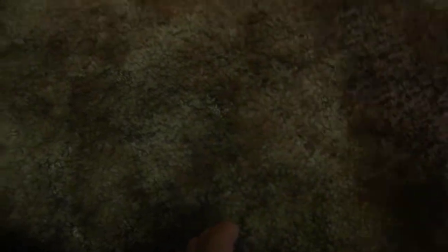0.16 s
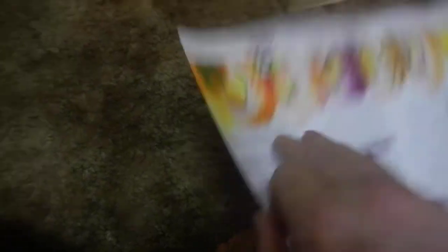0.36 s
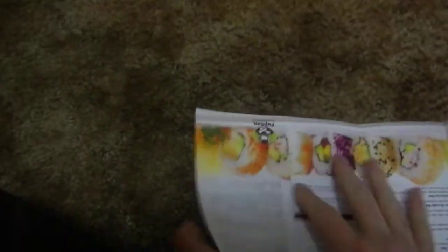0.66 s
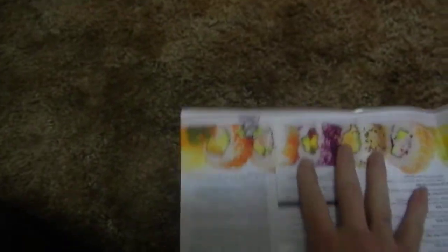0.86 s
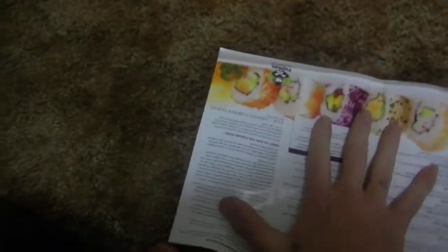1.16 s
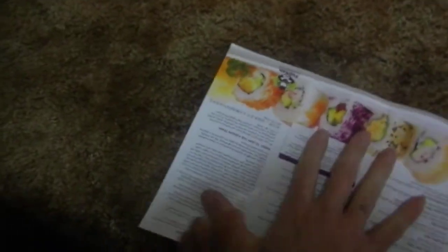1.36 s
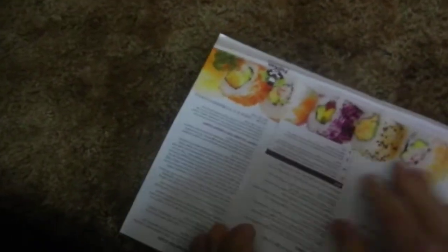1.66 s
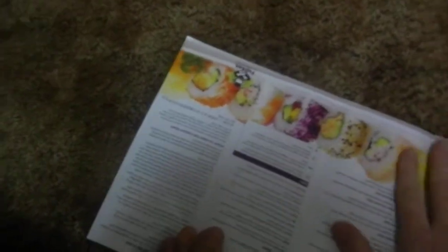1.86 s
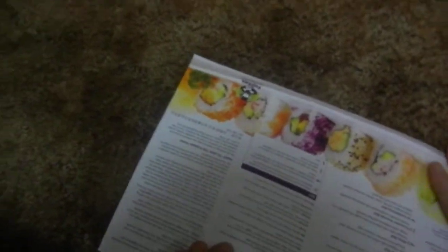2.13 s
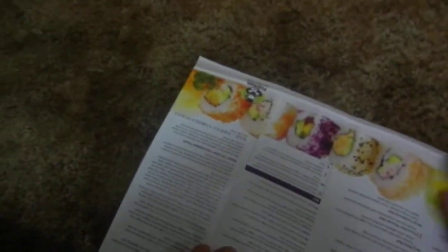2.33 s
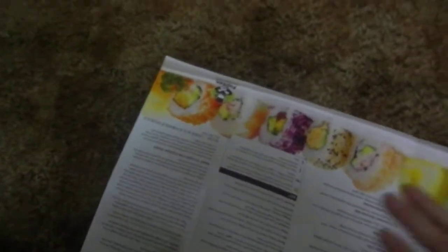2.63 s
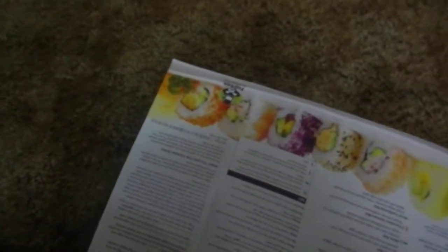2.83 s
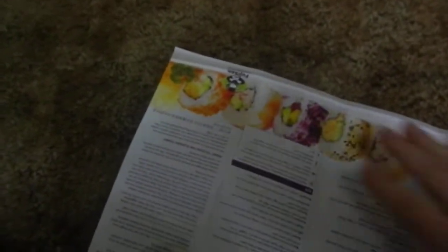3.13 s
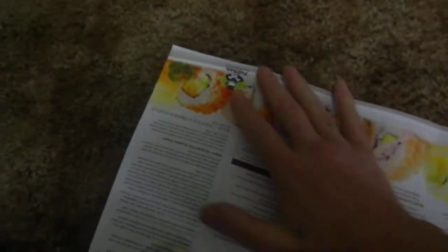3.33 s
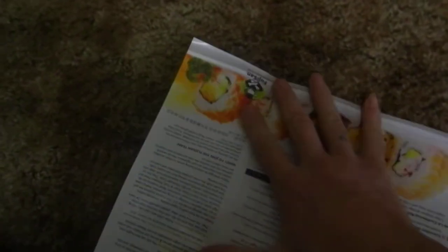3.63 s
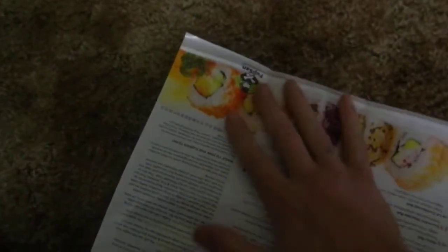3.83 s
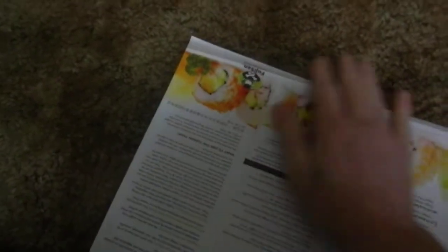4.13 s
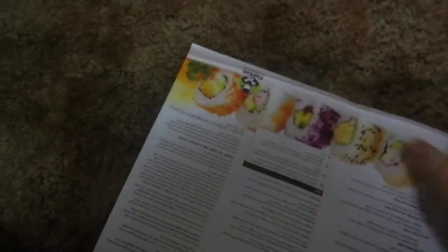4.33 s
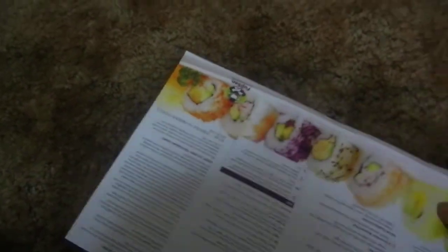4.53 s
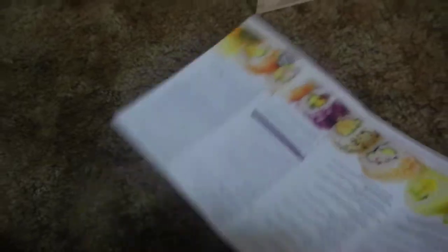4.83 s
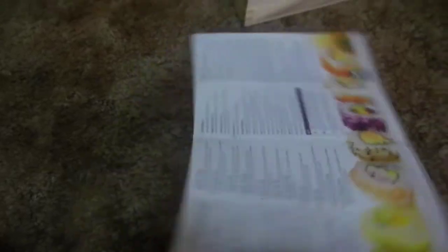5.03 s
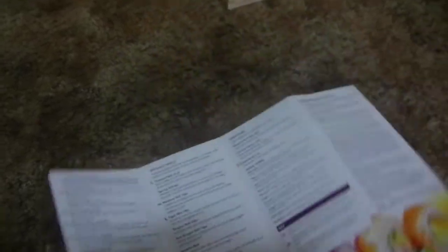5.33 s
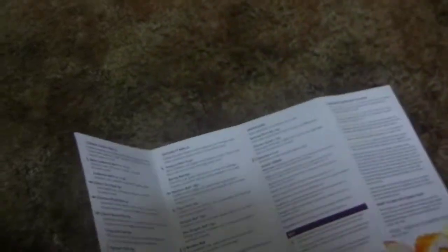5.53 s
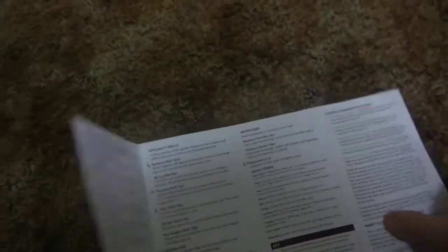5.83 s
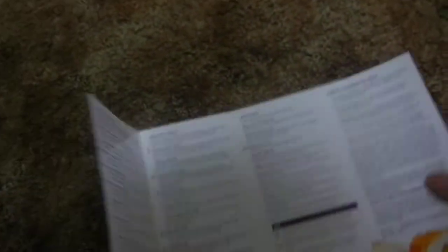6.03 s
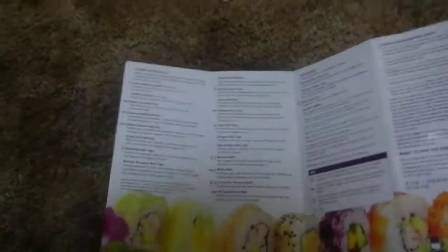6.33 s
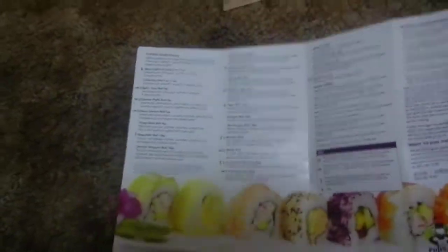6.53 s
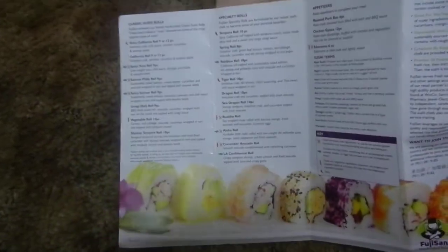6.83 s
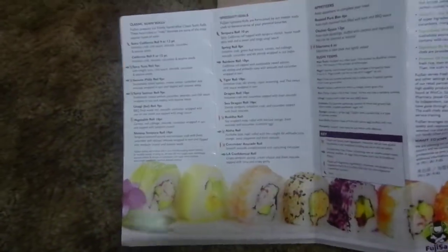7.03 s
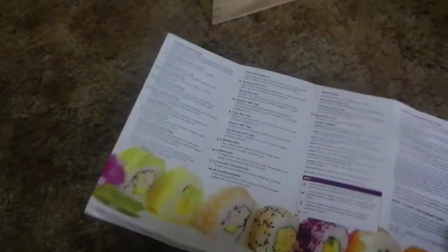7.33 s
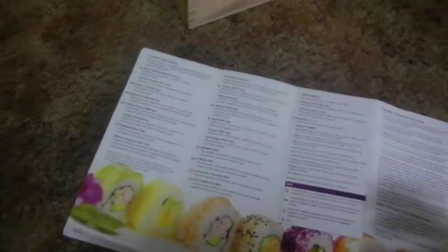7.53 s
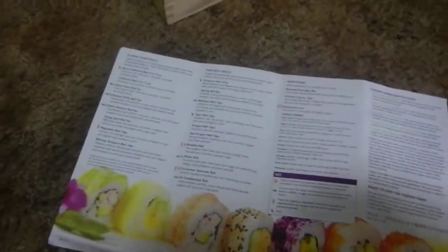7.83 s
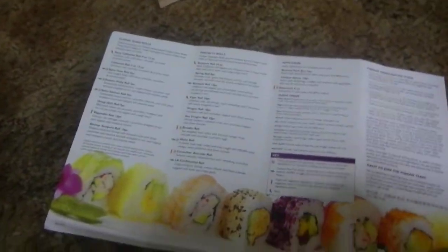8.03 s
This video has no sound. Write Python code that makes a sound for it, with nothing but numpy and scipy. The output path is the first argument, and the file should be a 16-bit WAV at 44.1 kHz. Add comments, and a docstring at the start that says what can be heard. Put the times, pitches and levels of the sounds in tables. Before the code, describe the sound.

Glossy, fairly stiff paper is handled very close to the microphone in a small, dry, carpeted room with faint air and a low steady hum. At once a rapid burst of snaps comes with soft low thuds; after a brief lull, more crumpling pops fall at 0.5 and 0.7 s. A bright sliding hiss swells from about 0.8 to 1.4 s. Further smoothing strokes follow from 1.7 s, busiest between 2 and 3 s, with crisp separate snaps and a sharp scrape near 3. Pops continue at 3.4 to 3.8 s, with a muted thud at 3.6. Gentler rubbing leads to a strong cluster of unfolding snaps around 4.8 s. Lighter rustles follow, then a hard crack near 5.95 and smaller pops at 6.2 and 6.6. Afterwards movement thins to faint rustles and tiny dry falling ticks, nearly still by 8 s.

```python
"""A quick burst of paper snaps comes first: a glossy folded leaflet is laid on a carpet, close by.
It is slid about and smoothed by hand, then lifted and opened. Strokes and bends are shaped random slips:
hiss as it slides, soft crumpling as it bends. Filtered pulses snap where a panel or crease buckles.
Soft low thuds come in the opening burst, near half a second and once more near the middle.
Late on come faint falling chirps, heard as dry ticks.
Shaped noise and two wavering sines make the air and low hum of a small, dead room."""
import sys
import numpy as np
from scipy import signal
from scipy.fft import rfft, irfft, next_fast_len
from scipy.io import wavfile
from scipy.ndimage import uniform_filter1d, map_coordinates

SR = 44100
rng = np.random.default_rng(int(sys.argv[2]) if len(sys.argv) > 2 else 0)


def inscribe(sig):
    """Save sig as 16-bit PCM at rate SR to the path in sys.argv[1].

    A 1-D sig is mono; a 2-D sig holds one channel per row.
    Samples are clipped to [-1, 1] before scaling.
    """
    pcm = np.round(np.clip(np.atleast_2d(sig).T, -1, 1) * 32767)
    wavfile.write(sys.argv[1], SR, pcm.astype(np.int16))


N = 360297  # length in samples

# tone colours of bending, of the sliding hiss and of its fine fizz: freq_hz, level_db (relative)
BEND_COLOUR = [(40, -23), (100, -7), (160, -4.5), (270, -8), (380, 5.5), (520, -1), (750, -0.5),
               (1100, -4.5), (1600, -8), (2600, -20), (6000, -52)]
SLIDE_COLOUR = [(300, -35.5), (900, -1.5), (1400, -2.5), (2000, 0), (2800, 1), (4000, -2.5), (5200, -9),
                (7000, -12.5), (11000, -21), (16000, -38)]
FIZZ_COLOUR = [(2000, -22.5), (4500, -1), (6500, -4), (8000, -4), (10000, -5), (12500, -7.5),
               (15800, -11.5)]


def rustle():
    """Sliding gives dense bright slips with a few crinkles; bending gives sparser, lower ones."""
    bend_db, slide_db, fizz_db = handling()
    pressure_db = 0.9 * wobble(45)
    crinkles = 0.3 * slips(rate=160, spread_db=2.5)

    slide_slips = slips(rate=20000, spread_db=1.5) + crinkles
    slide_hiss = stereo(patchy(slide_slips, depth_db=1.3), SLIDE_COLOUR)
    slide = amp(slide_db + pressure_db) * slide_hiss

    fizz_slips = slips(rate=30000, spread_db=0.0) + 0.5 * crinkles
    fine_hiss = stereo(patchy(fizz_slips, depth_db=1.5), FIZZ_COLOUR)
    fizz = amp(fizz_db + pressure_db) * fine_hiss

    # a sheet that is bent harder gives way in lumps; at rest it barely stirs
    effort = np.interp(bend_db, [-56, -42], [0.15, 1])
    lumps_db = 2 * effort * wobble(60)
    crumple = stereo(patchy(slips(rate=2800, spread_db=2.5), depth_db=1.96), BEND_COLOUR)
    bend = amp(bend_db + lumps_db) * crumple
    return slide + nearby(fizz, echo_db=-28.5) + bend


# strokes of paper over carpet, skin or paper; each gathers speed, runs on and slows to rest:
# full_speed_s, hold_s, hiss_db, fizz_db, rise_s, fall_s
STROKES = [(0.016, .05, -51, -58, 0.11, 0.073), (0.138, .015, -52, -56, 0.02, 0.034),
           (0.27, .03, -55.5, -60.5, .12, .2), (0.456, 0.1, -38.5, -43.5, .03, 0.023),
           (0.665, .06, -39.5, -46, 0.062, .2), (0.843, 0.069, -31, -31, 0.18, 0.52),
           (1.19, 0.2, -37, -35.5, .4, 0.083), (1.48, .06, -54, -56.5, .1, .25),
           (1.728, .09, -45, -45, .1, .1), (1.967, 0.097, -38.5, -38.5, 0.45, 0.39),
           (2.346, 0.013, -34.5, -47, 0.017, 0.025), (2.481, 0.15, -34, -41, 0.014, 0.17),
           (2.588, 0.024, -33, -34.5, 0.046, 0.072), (2.703, 0.066, -38.5, -42, 0.14, 0.061),
           (2.863, .06, -38.5, -46, .03, .06), (2.961, 0.0089, -25.5, -40, 0.024, 0.026),
           (3.24, .08, -62, -78, 0.55, .1), (3.355, 0.051, -39.5, -48, 0.029, .08),
           (3.467, 0.09, -36, -40, 0.078, 0.2), (3.778, .04, -36, -46, .04, 0.092),
           (3.88, 0.051, -37, -36.5, 0.12, 0.21), (4.03, .05, -45.5, -50, 0.11, 0.17),
           (4.316, 0.16, -51.5, -52, 0.083, 0.208), (4.596, 0.15, -38, -46.5, 0.19, 0.24),
           (4.958, 0.17, -52.5, -53.5, .2, .15), (5.227, 0.061, -41, -45.5, 0.057, 0.13),
           (5.386, .02, -47.5, -53, .08, 0.51), (5.567, 0.075, -44, -45.5, .06, 0.22),
           (5.83, 0.019, -37.5, -43, 0.18, .08), (5.92, 0.14, -36.5, -50, 0.12, 0.17),
           (6.165, 0.0099, -30.5, -36.5, .08, 0.039), (6.287, .012, -40, -41, 0.026, 0.017),
           (6.388, 0.17, -44, -46, 0.35, 0.28), (6.71, .06, -57.5, -69.5, .1, 0.31),
           (7.08, 0.12, -45.5, -50.5, 0.112, 0.11), (7.276, 0.14, -53, -55, .1, 0.18),
           (7.55, 0.42, -66.5, -67.5, .2, .2), (8.052, 0.09, -62.5, -62.5, 0.035, .1)]
# the hand bows the sheet: full_bend_s, hold_s, level_db
BOWS = [(0.059, 0.0078, -34), (0.149, 0.043, -47.5), (0.489, 0.042, -31), (0.681, .04, -31.5),
        (0.89, 0.088, -38), (1.706, 0.043, -38), (2.045, 0.051, -35), (3.55, 0.035, -48),
        (3.971, 0.012, -42), (4.5, 0.051, -44), (4.71, 0.086, -42), (5.053, 0.067, -47), (5.223, 0.08, -36),
        (5.58, 0.01, -38.5), (5.827, 0.02, -47), (6.087, 0.156, -43.5), (6.285, 0.0086, -37.5),
        (6.417, 0.02, -41.5), (7.09, 0.13, -53)]
BEND_RISE_S, BEND_FALL_S = 0.066, 0.084
DRAG_DB = -10  # sliding also flexes the sheet, this far under its hiss
SETTLE_DB, SETTLE_RISE_S, SETTLE_FALL_S = -16.5, 0.006, 0.056  # crumpling around a snap, relative to it
REST_DB = -57  # the sheet stirring on its own


def handling():
    """Levels of crumpling, hiss and fizz: strokes hiss; bowing, dragging and snapping crumple the sheet."""
    hiss = [(s, hold, db, rise, fall) for s, hold, db, _, rise, fall in STROKES]
    fizz = [(s, hold, db, rise, fall) for s, hold, _, db, rise, fall in STROKES]
    bowed = [(s, hold, db, BEND_RISE_S, BEND_FALL_S) for s, hold, db in BOWS]
    dragged = [(s, hold, db + DRAG_DB, rise, fall) for s, hold, db, rise, fall in hiss]
    settling = [(s, 0, db + SETTLE_DB, SETTLE_RISE_S, SETTLE_FALL_S) for s, db, *_ in SNAPS]
    resting = [(0, N / SR, REST_DB, 1, 1)]
    crumpling = bowed + dragged + settling + resting
    return movements(crumpling), movements(hiss), movements(fizz)


RAMP_DB = 20  # rise and fall times span this many dB


def movements(rows):
    """Level in dB of overlapping movements (s, hold s, dB, rise s, fall s): each rises, holds, dies away."""
    t = np.arange(0, N, 32) / SR
    s, hold, db, rise, fall = np.transpose(rows)[:, :, None]
    away = np.maximum(s - t, 0) / rise + np.maximum(t - s - hold, 0) / fall
    power = np.sum(amp(db - RAMP_DB * away) ** 2, axis=0)
    return np.interp(np.arange(N) / SR, t, 10 * np.log10(power + 1e-12))


def slips(rate, spread_db):
    """Tiny random stick-slip impulses, rate a second on average: many weak, a few strong."""
    strength = amp(spread_db * np.minimum(rng.exponential(size=N), 5))
    happens = rng.random(N) < rate / SR
    return unit(rng.standard_normal((2, N)) * strength * happens)


def patchy(pair, depth_db):
    """The sheet's resonances shift as its shape and the touching points change."""
    spectrum = signal.stft(pair, nperseg=512)[2]
    field = rng.standard_normal(spectrum.shape[1:])
    field = uniform_filter1d(field, size=7, axis=0)  # smooth over frequency
    field = uniform_filter1d(field, size=10, axis=1)  # smooth over time
    return signal.istft(spectrum * amp(depth_db * unit(field)), nperseg=512)[1][:, :N]


def nearby(x, echo_db, count=7):
    """Hands, panels and other near surfaces return weak early copies that ripple the spectrum."""
    echoes = np.zeros((2, SR // 50))
    echoes[:, 0] = 1  # direct sound
    for channel in echoes:
        delays = rng.integers(SR // 1000, len(channel), count)
        channel[delays] = amp(echo_db) * rng.standard_normal(count)
    echoes = echoes / np.linalg.norm(echoes, axis=1, keepdims=True)
    return signal.fftconvolve(x, echoes, axes=1)[:, :N]


def crackle(rate=260, spread_db=1.0, crackle_db=-8, yield_db=-37):
    """Creases in a bowed sheet let go in small cracks of limited size; a slack sheet makes none."""
    bend_db = handling()[0]
    strain = np.interp(bend_db, [-52, -42], [0, 1])
    level_db = np.minimum(bend_db, yield_db) + crackle_db
    return strain * amp(level_db) * stereo(slips(rate, spread_db), SLIDE_COLOUR)


# buckling snaps; a larger patch sounds lower, a faster flip reaches higher:
# start_s, level_db, patch_hz, top_edge_hz
SNAPS = [(0.0243, -28, 632, 12200), (0.0668, -13.5, 640, 910), (0.0684, -13, 610, 3130),
         (0.0806, -20, 482, 2500), (0.092, -31.5, 547, 2700), (0.3154, -40.5, 776, 12000),
         (0.4964, -15, 750, 1400), (0.5117, -18, 900, 1720), (0.5206, -16, 713, 3470),
         (0.6569, -26, 627, 8040), (0.666, -25.5, 483, 5000), (0.7001, -15, 1040, 1080),
         (0.7036, -14.5, 800, 1790), (0.9196, -20.5, 980, 5700), (1.4014, -20, 3900, 4660),
         (1.4635, -34.5, 620, 9300), (1.7468, -32.5, 780, 7900), (2.1367, -15, 896, 5600),
         (2.215, -26, 547, 8800), (2.478, -33, 1010, 12000), (2.4879, -17.5, 1100, 1670),
         (2.592, -17, 485, 10800), (2.6199, -19, 3480, 4200), (2.6269, -22.5, 690, 7100),
         (2.8709, -33, 870, 12000), (2.9742, -16.5, 2100, 3440), (3.3932, -15, 630, 5270),
         (3.639, -16, 750, 3900), (3.685, -31.5, 710, 4700), (3.785, -17.5, 650, 5150),
         (3.9864, -34.5, 430, 800), (4.486, -36, 534, 7050), (4.5887, -26.5, 1500, 6330),
         (4.7089, -26, 1090, 3770), (4.7703, -14.5, 1015, 3520), (4.7835, -15.5, 1030, 3580),
         (4.8023, -18, 810, 3520), (5.5674, -25.5, 1140, 12000), (5.9315, -25, 800, 5200),
         (5.9459, -13, 1270, 4580), (5.949, -17, 1600, 3840), (6.202, -18.5, 615, 1490),
         (6.6087, -20, 840, 2540)]


def snaps(flutter_db=-22, flutter_t60_s=0.017, ring_db=-36, ring_t60_s=0.044, lead_db=-29, lead_t60_s=0.019):
    """A patch strains, flips through in one pulse, and leaves waves bouncing about the sheet."""
    track, start = np.zeros((2, N)), SR // 100  # 10 ms of strain before the flip
    t = (np.arange(4096) - start) / SR
    flutter = amp(flutter_db - 60 * abs(t) / flutter_t60_s)
    ring = amp(ring_db - 60 * abs(t) / ring_t60_s)
    lead = amp(lead_db - 60 * abs(t) / lead_t60_s)
    envelope = np.where(t < 0, lead, flutter + ring)
    for s, db, mode_hz, top_hz in SNAPS:
        flip = [[1], [0]] * (t == 0)
        force = envelope * rng.standard_normal((2, len(t))) + flip
        waves = dispersed(signal.fftconvolve(force, patch(mode_hz, top_hz)[None], axes=1))
        snap = sides(waves, mode_hz, side_db=-13.0)
        strength = np.sqrt(np.mean(snap[:, start:start + SR // 200] ** 2))  # rms of the first 5 ms
        add(track, s + t[0], amp(db) * snap / strength)
    return track


# brightness of a struck or rubbed sheet: freq_hz, level_db (relative)
SHEET_COLOUR = [(60, -3), (170, 4.5), (270, -3), (390, 7), (500, -3), (650, -2.5), (950, -1), (1500, -3.5),
                (2800, 3), (4500, 1.5), (6500, -1), (10000, 5), (16000, 0)]


def patch(mode_hz, top_hz, leak=0.012, mode_db=5, mode_width=0.067):
    """A patch of paper rings briefly at its lowest mode, sounds less above, and little past the top edge."""
    def gain(hz):
        below = 1 + (mode_hz / (hz + 1)) ** 4
        above = 1 + (hz / (1.3 * mode_hz)) ** 3
        body = 1 / below / above
        edge = 1 / (1 + (hz / top_hz) ** 8) + leak
        ring_db = mode_db / (1 + ((hz / mode_hz - 1) / mode_width) ** 2)
        return amp(along(SHEET_COLOUR, hz) + ring_db) * np.sqrt(body * edge)
    return impulse(gain)


def dispersed(x, lag_s=0.000435):
    """Bending waves carry highs faster than lows, so a pulse spreads into a few swings."""
    size = 2 * x.shape[-1]
    hz = np.fft.rfftfreq(size, 1 / SR)
    delay_s = lag_s / np.sqrt(hz / 3000 + 0.25)
    phase = -2j * np.pi * np.cumsum(delay_s) * SR / size
    return irfft(rfft(x, size) * np.exp(phase), size)[..., :x.shape[-1]]


def sides(pair, mode_hz, side_db=-20):
    """Two unrelated signals as left and right: the higher the patch, the more the sides differ, to a limit."""
    side = pair[1] * np.minimum(amp(side_db) * mode_hz / 1000, 0.7)
    return np.array([pair[0] + side, pair[0] - side])


# brief brushes and flaps, as panels rub or bow without snapping:
# peak_s, level_db (the swell tops it by 3 dB), patch_hz, top_edge_hz, half_length_s (about 5 dB below peak)
BRUSHES = [(0.385, -35.5, 474, 570, 0.012), (0.464, -29, 594, 4500, 0.0017), (1.681, -30, 636, 2400, 0.004),
           (1.739, -31, 945, 2600, 0.0046), (1.808, -38, 1280, 4530, 0.0091),
           (2.224, -36, 393, 650, 0.0034), (2.351, -38, 3120, 4300, 0.0027), (2.367, -37, 347, 635, 0.0041),
           (2.908, -31.5, 2970, 4830, 0.01), (2.9655, -17.5, 5000, 14000, 0.00033),
           (3.38, -25.5, 1070, 1250, 0.0061), (3.412, -25.5, 710, 710, 0.0016),
           (3.78, -27.5, 910, 2450, .0035), (4.546, -35.5, 2880, 5600, 0.0067),
           (4.643, -34, 4260, 5270, .012), (4.874, -43, 3500, 5500, 0.01),
           (5.0697, -31.5, 780, 830, 0.0017), (5.15, -45, 460, 604, 0.015), (5.199, -39, 397, 900, 0.0072),
           (5.238, -29.5, 776, 6030, 0.0042), (5.286, -29.5, 1260, 12000, 0.0074),
           (5.335, -38, 517, 1000, .0047), (5.652, -38, 3330, 4500, 0.012), (6.226, -36, 497, 1300, 0.01),
           (6.341, -40, 500, 1800, .004), (6.443, -41, 1900, 2200, 0.0083),
           (6.621, -33.5, 786, 1110, 0.0072), (6.991, -47, 362, 900, 0.0024),
           (7.175, -34, 840, 1410, 0.0013), (7.278, -45, 1730, 4480, 0.0046), (7.315, -47, 415, 900, 0.012),
           (8.067, -49, 740, 5000, 0.0024)]


def brushes(fade_db=6):
    """A cluster of slips swells and fades within one patch."""
    track, t = np.zeros((2, N)), np.arange(-2048, 2048) / SR
    for s, db, mode_hz, top_hz, half in BRUSHES:
        noise = rng.standard_normal((2, len(t)))
        paper = patch(mode_hz, top_hz, leak=0.0056)
        rub = signal.fftconvolve(noise, paper[None], axes=1)[:, :len(t)]
        swell = amp(-fade_db * (np.hypot(1, 1.51 * t / half) - 1.5))
        brush = sides(rub, mode_hz, side_db=-21.0) * swell
        add(track, s + t[0], amp(db) * unit(brush) * np.sqrt(np.mean(swell ** 2)))
    return track


# soft knocks of hand and leaflet on the carpet: start_s, level_db
THUDS = [(0.026, -36), (0.072, -40), (0.091, -35.5), (0.496, -55), (0.521, -53), (3.63, -41), (3.639, -36)]
# tone colour of the knocked carpet: freq_hz, level_db (relative)
THUD_COLOUR = [(30, -16), (70, -10), (110, -1.5), (180, -12.5), (300, -5.5), (700, -19), (2000, -45.5)]


def thuds():
    """The carpet takes a soft push and leaves a short low bump."""
    track, t = np.zeros(N), np.arange(SR // 10) / SR
    carpet = impulse(lambda hz: amp(along(THUD_COLOUR, hz)))
    for s, db in THUDS:
        grain = 0.06 * rng.standard_normal(len(t)) * amp(-60 * t / 0.045)
        push = (t == 0) + grain
        bump = signal.fftconvolve(push, carpet)
        strength = np.sqrt(np.mean(bump[:SR // 50] ** 2))  # rms of the first 20 ms
        add(track, s, amp(db) * bump / strength)
    return track


# faint dry ticks: start_s, peak_db
TICKS = [(6.672, -36), (6.7396, -35), (6.7636, -37.5), (6.8123, -37), (6.849, -43), (6.8874, -35.5),
         (7.4223, -38.5), (7.475, -35.5), (7.723, -33.5), (7.9111, -35), (8.1216, -37), (8.156, -40)]


def ticks(start_hz=2550, end_hz=1720, glide_s=0.00058, t60_s=0.013, attack_s=0.00064, echo_s=0.0061, echo_db=-7):
    """Each small tick falls quickly in pitch and echoes twice off near surfaces."""
    track, t = np.zeros(N), np.arange(SR // 25) / SR
    for s, db in TICKS:
        detune = 1 + 0.0059 * rng.standard_normal()
        hz = (end_hz + (start_hz - end_hz) * np.exp(-t / glide_s)) * detune
        chirp = np.sin(2 * np.pi * np.cumsum(hz) / SR)
        body = 0.24 * np.sin(2 * np.pi * 800 * t)
        tick = (chirp + body) * amp(-60 * t / t60_s) * (1 - np.exp(-t / attack_s))
        for bounce in range(3):
            add(track, s + bounce * echo_s, amp(db + bounce * echo_db) * tick / abs(tick).max())
    return track


# reverberation time of the room: freq_hz, t60_s
ROOM_DECAY = [(150, 0.43), (400, 0.3), (1000, 0.074), (4000, 0.18), (12000, 0.2)]


def room(x):
    """A short diffuse tail: lows ring longest, mids die fastest, treble lasts a little longer than mids."""
    hz, t, spectrum = signal.stft(rng.standard_normal((2, SR // 3)), SR, nperseg=256)
    decay = amp(-60 * t / along(ROOM_DECAY, hz)[:, None])
    mid, side = signal.istft(spectrum * decay, SR, nperseg=256)[1]
    tail = np.array([mid + 0.31 * side, mid - 0.1 * side])
    tail = tail / np.linalg.norm(tail[0])
    tail = np.pad(tail, ((0, 0), (SR // 170, 0)))  # the tail starts about 6 ms late
    return signal.fftconvolve(x, tail, axes=1)[:, :N]


# tone colour of the room air: freq_hz, level_db (relative)
AIR_COLOUR = [(20, -33), (45, -8), (70, 3), (140, 0.5), (200, 1.5), (270, -12.5), (350, -1.5), (480, -17.5),
              (700, -57), (1100, -9.5), (2600, -13.5), (4800, -56), (12000, -27), (16000, -48)]
# steady appliance tones: pitch_hz, level_db (rms)
HUM = [(134.6, -68.5), (333.8, -68.5)]


def background(air_db=-60):
    """Steady room air as shaped noise, with a slightly unsteady appliance hum of phase-wandering sines."""
    t = np.arange(N) / SR
    hum = sum(amp(db) * np.sqrt(2) * np.sin(2 * np.pi * hz * t + 0.63 * wobble(2.1)) for hz, db in HUM)
    air = stereo(rng.standard_normal((2, N)), AIR_COLOUR)
    return hum + amp(air_db) * air


# how alike left and right are: freq_hz, likeness (1 = identical)
ALIKE = [(40, 0.67), (150, 0.82), (500, 0.85), (2000, 0.92), (4000, 0.77), (8000, 0.42), (14000, 0.44)]


def stereo(pair, colour):
    """Two unrelated signals, coloured, as left and right that differ mostly in the treble; rms 1."""
    def response(hz):
        turn = np.arccos(np.clip(along(ALIKE, hz), -1, 1)) / 2
        return amp(along(colour, hz)) * [np.cos(turn), np.sin(turn)]
    mid, side = filtered(pair, response)
    return unit(np.array([mid + side, mid - side]))


def amp(db):
    """Decibels to gain."""
    return 10 ** (np.asarray(db) / 20)


def unit(x):
    """Scale to rms 1."""
    return x / np.sqrt(np.mean(x ** 2) + 1e-20)


def along(points, hz):
    """(Hz, value) points read on a log frequency axis."""
    f, v = np.transpose(points)
    return np.interp(np.log(hz + 1), np.log(f + 1), v)


def wobble(rate):
    """A smooth random curve, rate knots a second."""
    knots = rng.standard_normal(int(N * rate / SR) + 4)
    return map_coordinates(knots, [np.arange(N) * rate / SR])


def filtered(x, response):
    """x times a response of frequency."""
    m = next_fast_len(N + SR // 4)
    return irfft(rfft(x, m) * response(np.fft.rfftfreq(m, 1 / SR)), m)[..., :N]


def impulse(gain, size=2048):
    """The causal (minimum-phase) impulse response with this gain over frequency."""
    cepstrum = irfft(np.log(np.maximum(gain(np.fft.rfftfreq(size, 1 / SR)), 1e-6)))
    fold = np.r_[1, np.full(size // 2 - 1, 2), 1, np.zeros(size // 2 - 1)]
    return irfft(np.exp(rfft(cepstrum * fold)))


def add(track, s, sound):
    """Mix a sound into a track at time s."""
    i = max(round(s * SR), 0)
    track[..., i:i + sound.shape[-1]] += sound[..., :N - i]


def scene():
    """Rustle, crackle, blows and their room over the background."""
    blows = snaps() + brushes() + thuds() + ticks()
    return rustle() + crackle() + blows + amp(-16.0) * room(blows) + background()


# colour difference between the microphones: freq_hz, left_minus_right_db
BALANCE = [(60, 2), (300, 1), (2000, 0.5), (4000, -0.5), (9000, -1.7)]
TOP_HZ = 15950  # nothing passes above


def record(dry):
    """The two microphones differ a little in colour, round off the highest peaks and are band-limited."""
    heard = filtered(dry, lambda hz: amp(np.outer([0.5, -0.5], along(BALANCE, hz))))
    rounded = heard / (1 + abs(heard / 0.88) ** 6) ** (1 / 6)
    return filtered(rounded, lambda hz: hz < TOP_HZ)


dry = scene()
out = record(dry)
inscribe(out)
```